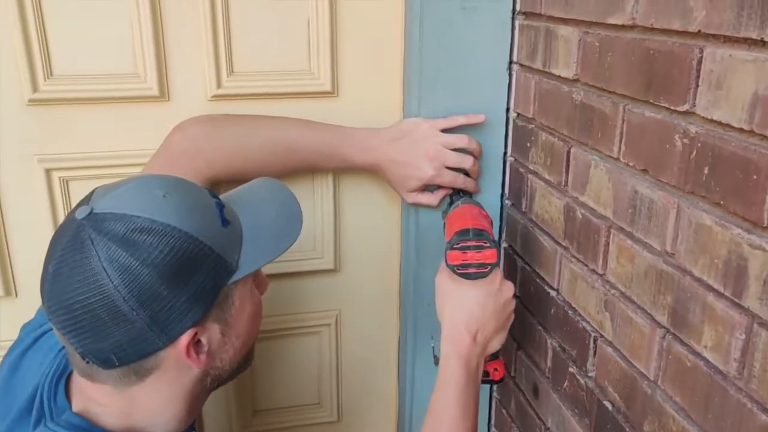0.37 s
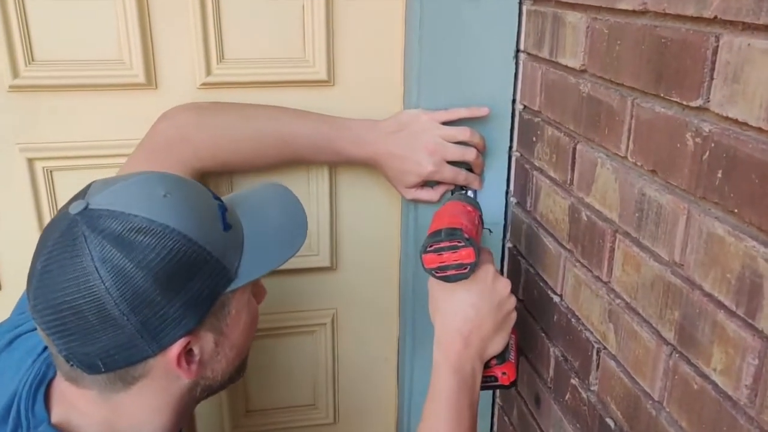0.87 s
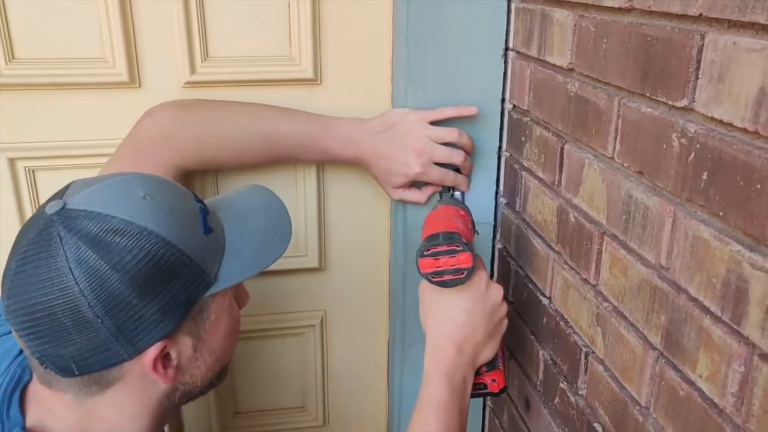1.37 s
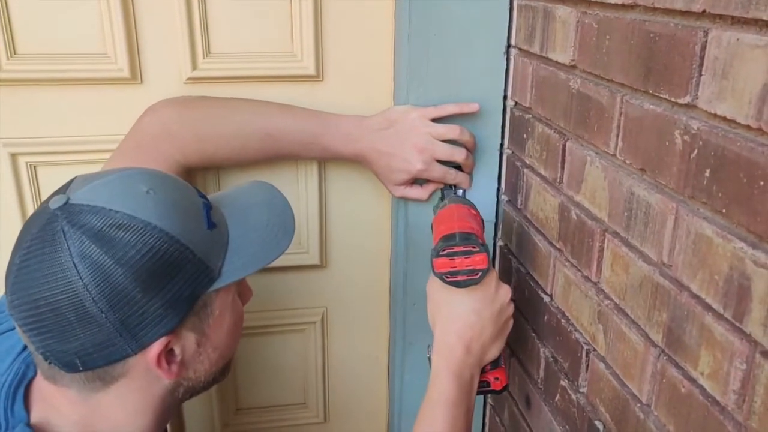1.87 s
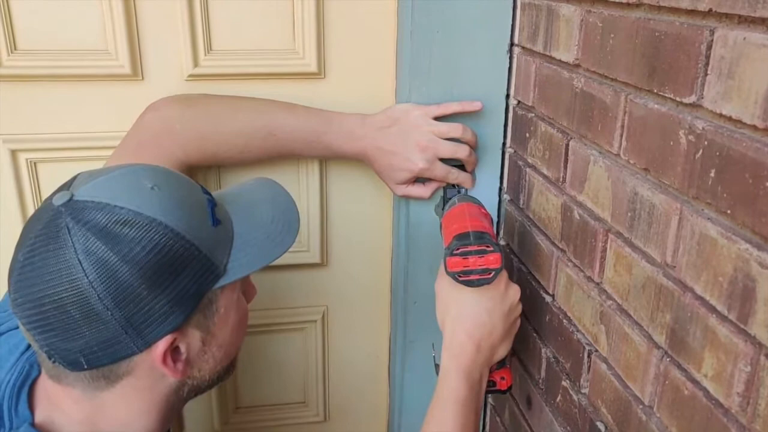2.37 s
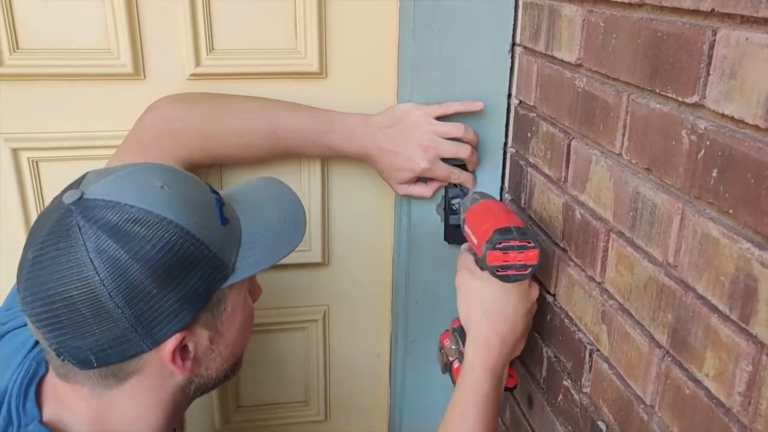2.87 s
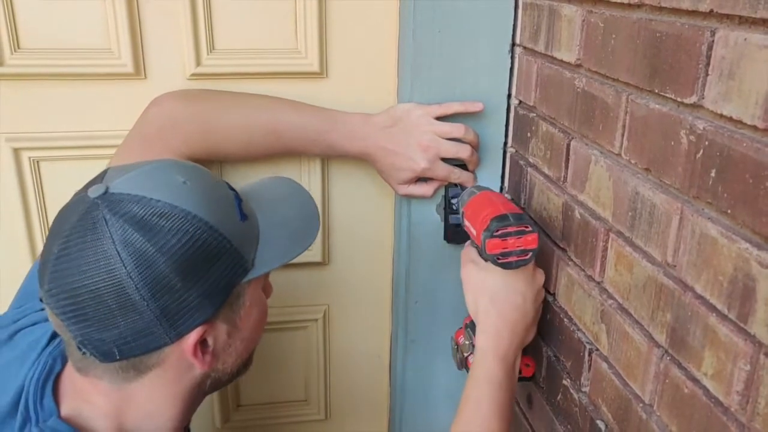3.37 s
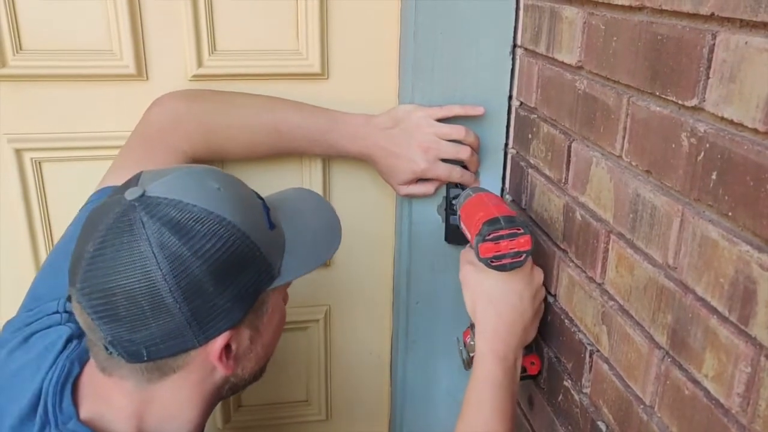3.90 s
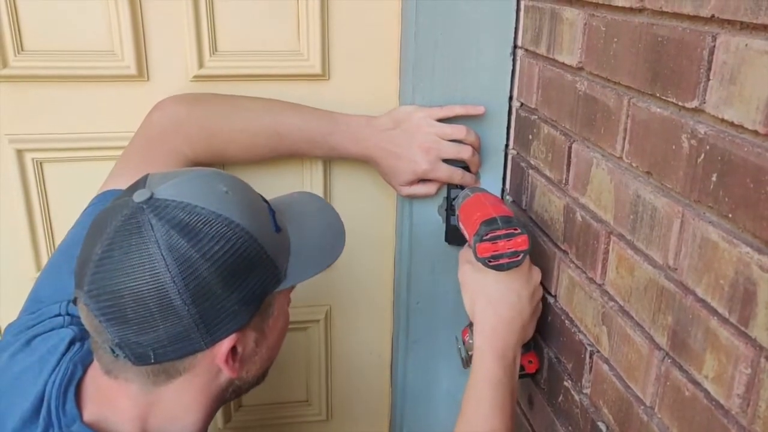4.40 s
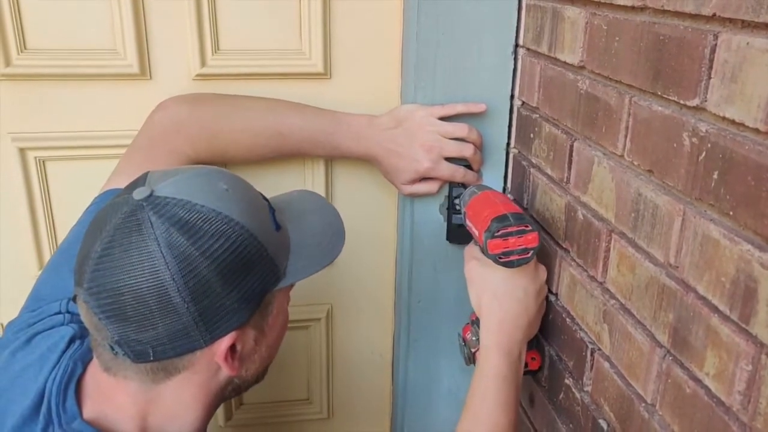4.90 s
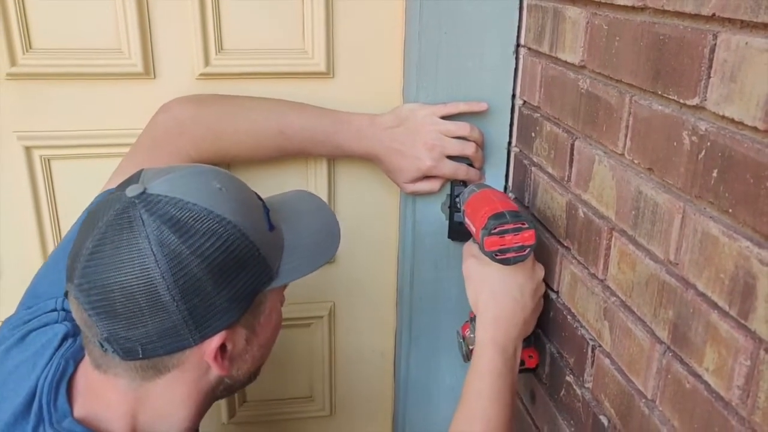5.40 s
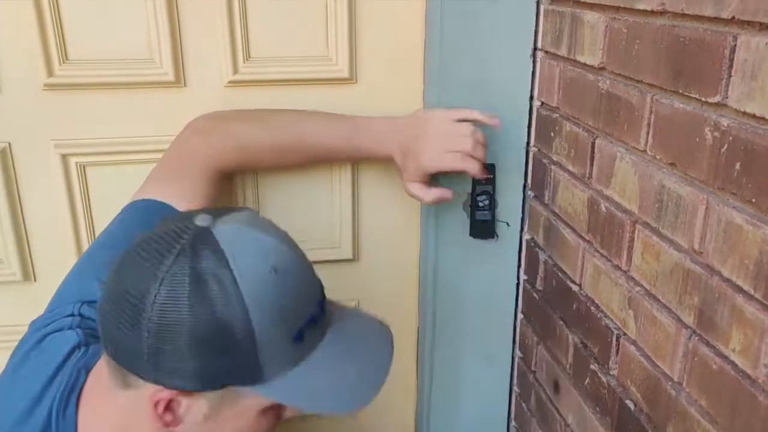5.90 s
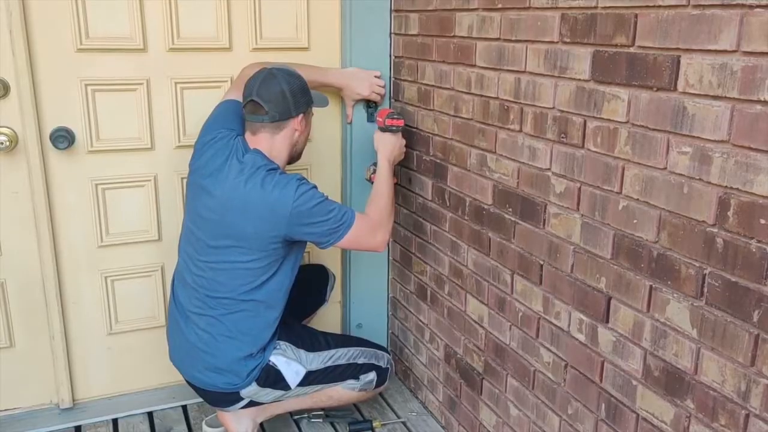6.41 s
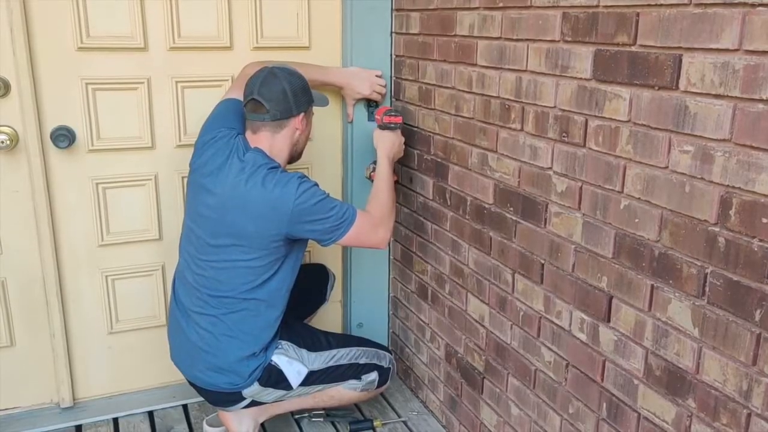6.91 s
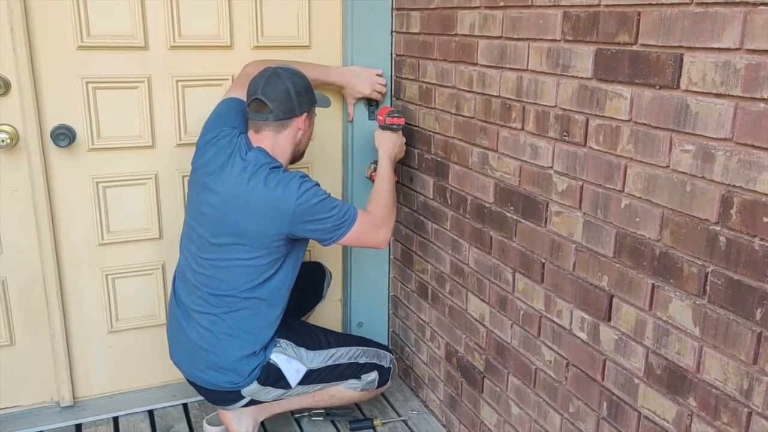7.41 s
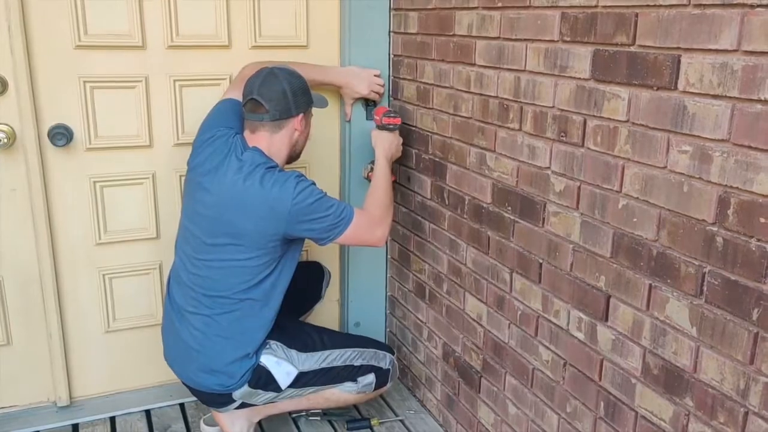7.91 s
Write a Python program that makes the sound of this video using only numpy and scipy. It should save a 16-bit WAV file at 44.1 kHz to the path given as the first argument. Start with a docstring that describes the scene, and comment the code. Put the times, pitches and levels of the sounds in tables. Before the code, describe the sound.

Brief cordless drill pulls rattle and whistle against a door jamb on a brick porch, ending in a rapid cluster of loud wooden knocks.

```python
"""Cordless drill on a porch

A cordless drill drives screws into door trim on a brick porch, in short trigger pulls.
Gear teeth rattle the housing and make the trim sing; the speed switch whistles as it chops the current.
Each slip of the bit knocks the jamb, thumps the door and cracks off the steel, between soft brushes.
Shaped noise and wavering hums make the yard; a noise-like tail makes the porch echo."""
import sys
import numpy as np
from scipy import signal
from scipy.fft import rfft, irfft
from scipy.io import wavfile
from scipy.ndimage import uniform_filter1d

SR = 44100
rng = np.random.default_rng(int(sys.argv[2]) if len(sys.argv) > 2 else 0)


def digitize_waveform(pressure):
    """Quantize a signal to 16-bit integers and store it at the path in sys.argv[1].

    Rows of a 2-D input are taken as channels; values are limited to [-1, 1].
    """
    field = np.atleast_2d(pressure).T
    bounded = np.clip(field, -1, 1)
    quanta = np.round(bounded * 32767).astype(np.int16)
    wavfile.write(sys.argv[1], SR, quanta)


def magnitude_from_level(level_db):
    """Linear magnitude for a level in decibels (20 dB per decade)."""
    exponent = np.asarray(level_db, float) / 20
    return 10 ** exponent


N = 353902  # length in samples

# colour of the outdoor air: f/Hz, relative level per Hz/dB
YARD_SPECTRUM = [(8.8, -24.5), (15, 3), (38, -8.5), (54, -18), (88, -4.5), (129, -17), (144, -17.5),
                 (177, -6), (205, -1), (399, -77.5), (600, -17.5), (1430, -15), (4080, -25.5), (4990, -25),
                 (15500, -30.5)]
# low rumble of the air: t/s, level/dB
RUMBLE_LEVEL = [(0, -50), (.9, -48), (1.1, -36), (1.499, -44), (2.501, -48.5), (3.501, -33), (4, -39.5),
                (4.7, -34.5), (5.099, -44.5), (5.699, -43), (6.5, -62), (7.1, -46), (7.349, -48.5),
                (7.701, -42), (8.02, -57)]
# distant machines: f/Hz, width/Hz, level/dB
DISTANT_HUMS = [(27.9, 1.1, -54.5), (80.7, 26, -55), (118.9, 0.9, -57)]
# how much left and right differ: f/Hz, side relative to mid/dB
SIDE_SPECTRUM = [(60, -24), (200, -25), (380, -11), (700, -13), (1290, -7), (2380, -1), (4400, 1),
                 (15000, 2)]
# a hand or tool brushes the trim: t/s, length/s, level/dB, centre f/Hz, width/Hz
BRUSH_STROKES = [(0.191, 0.055, -50.5, 4200, 4840), (2.991, 0.039, -53, 2454, 1792),
                 (5.62, 0.067, -46.5, 1500, 1164), (5.634, 0.02736, -61, 7000, 4000),
                 (5.908, 0.051, -61, 5500, 4001), (7.306, 0.035, -56, 5880, 3000)]
# the bit slips, seats or bottoms out:
# t/s, trim knock level/dB, door thump level/dB, depth of the thump/dB per octave, steel crack level/dB
BIT_BLOWS = [(0.309, -22, -39.5, -9, -30.5), (0.569, -35, -33, 24, -77), (1.19, -34, -42, 6, -32.5),
             (2.575, -16, -11.5, 5.5, -22), (2.763, -8.5, -9.5, 5.5, -19.5), (3.193, 1.5, -2.5, 2, -12),
             (4.246, -21, -18.5, 4, -20), (4.258, -6, 3, 1.9, -6), (4.358, 1.5, -16.5, -5.5, -10),
             (5.284, -11, -17.5, 1.5, -24.5), (5.293, -4, -2.5, -2.5, -21), (5.648, -26, -61, 2.5, -36.5),
             (6.848, -5, -3, -2, -11.5), (7.483, -5.5, -4, -3.5, -10.5), (7.811, -5.5, -2.5, -9, -8.5),
             (7.87, 2.5, -9, -0.5, -5.5), (7.882, -1.5, -3.5, 1.5, -26), (7.891, -2, -17, -14.5, -24.5),
             (7.942, -5.5, -9.5, 9.5, -4), (7.951, 3, -33, 7.5, -17), (7.961, -4.5, -6.5, -10.5, -12)]
# the gears take up slack with a small knock: t/s, level/dB
SLACK_KNOCKS = [(1.44, -37.5), (2.036, -51), (3.089, -33), (3.392, -22.5), (3.697, -23.5), (3.991, -20),
                (4.568, -40), (5.057, -40.5), (5.074, -31), (6.033, -43), (6.432, -36), (6.692, -32),
                (7.145, -38.5), (7.394, -30.5)]
# the drill lurches and shoves the door with no click: t/s, level/dB, depth/dB per octave
DOOR_SHOVES = [(3.165, -19, -16.5), (4.102, -11.5, 7.5), (4.291, -27, -10), (4.34, -2, -0.3),
               (6.827, -12.5, 1.5), (7.449, -19.5, 7.5), (7.792, -21, 0)]
# resonances of the door: f/Hz, relative level/dB, time to fade by 60 dB/s
DOOR_MODES = [(47.35, -14.5, 0.65), (73.65, -7.5, 0.32), (90.6, 0, 0.17), (116.7, 5, 0.13),
              (146.6, -10, 0.27), (176.1, 0, 0.16), (197, -11, 0.19), (224.1, -5.5, 0.17), (262, -16, 0.16),
              (414.7, -24.5, 0.13)]
# resonances of the jamb: f/Hz, relative level/dB, time to fade by 60 dB/s
JAMB_MODES = [(436, -15.5, 0.18), (568, -11, 0.056), (784, -8.5, 0.11), (820, -15.5, 0.2),
              (954.5, 17.5, .014), (1030, -6.5, 0.029), (1170, -23, 0.03863), (1322, -0.5, 0.029),
              (1573, 5.5, 0.012), (1997, 9.5, 0.0063)]
# colour of the steel crack: f/Hz, relative level per Hz/dB
CRACK_SPECTRUM = [(880, -20), (1500, 1), (2310, -7.5), (3150, -1.5), (4710, -5), (8050, -9), (9700, -29),
                  (10900, -20.5), (15500, -29)]
# resonances of the drill's housing: f/Hz, width/Hz, relative level/dB
HOUSING_MODES = [(2650, 570, 1.5), (3757, 183, -11), (4570, 640, 2.5), (4926, 250, 3), (7000, 160, -23.5)]
# one list each time the switch chops the current:
# t/s, level of the first partial before it radiates/dB, share of each cycle switched on/0-1
WHINE_RUNS = [
    [(0.807, -60.5, 0.34), (0.879, -66, 0.17), (1.133, -50.5, 0.25), (1.439, -47.5, 0.41),
     (1.755, -50, 0.44), (2.05, -52.5, 0.49), (2.349, -49.5, 0.48), (2.53, -47.5, .56), (2.585, -42, 0.57),
     (2.771, -41, 0.54), (2.8, -44, .6)],
    [(3.068, -51, 0.43), (3.17, -36.5, 0.4)],
    [(3.385, -42.5, 0.42), (3.48, -21.5, 0.48)],
    [(3.69, -39, 0.41), (3.82, -28.5, 0.49)],
    [(3.985, -43, 0.42), (4.09, -33.5, 0.5)],
    [(4.555, -43.5, .38), (4.72, -32, 0.46)],
    [(4.85, -55.5, 0.11), (4.922, -44.5, 0.38), (5.132, -38, 0.38), (5.224, -39.5, .4), (5.402, -44, 0.42),
     (5.48, -79, 0.45)],
    [(6.02, -53, 0.47), (6.32, -50.5, 0.46)],
    [(6.42, -64, .35), (6.52, -49, 0.45)],
    [(7.13, -53.5, 0.45), (7.25, -46, .48)],
    [(7.6, -57, 0.37), (7.66, -49, 0.53), (7.8, -44, .4)],
]
# direction of each whistle partial: left over right/dB, left lead/radians
WHINE_DIRECTIONS = [(4.5, -2.42), (-11.5, 1.8), (-0.5, 1.2), (0.2, 0.1)]
# how well each whistle partial radiates: level/dB
PARTIAL_RADIATION = [1, 2.5, -12, -13.5]
# the long feathered start, trigger barely squeezed: t/s, speed/teeth per second, gear level/dB
SLOW_START = [(.84, 46.4, -69), (0.959, 68.4, -57.5), (1.03, 67, -61), (1.11, 86, -50.5), (1.17, 88, -56.5),
              (1.24, 85, -65), (1.34, 80, -51.5), (1.47, 69, -62), (1.549, 60, -66.5), (2.12, 50.2, -69),
              (2.17, 62, -58), (2.42, 87, -57.5), (2.564, 146, -50)]
# trigger pulls: press t/s, release t/s, top speed/teeth per second, gear level/dB, spin-up/s, run-down/s
TRIGGER_PULLS = [(2.578, 2.757, 200, -41.5, .01, .006), (3.068, 3.183, 560, -31.5, .05, .006),
                 (3.385, 3.485, 605, -23, .07, .13), (3.691, 3.794, 530, -28.5, .05, .11),
                 (3.983, 4.06, 710, -23, .045, .1), (4.236, 4.335, 610, -22, .04, .03),
                 (4.553, 4.674, 510, -32.5, .08, 0.12), (5.037, 5.161, 465, -39, .06, .2),
                 (6.019, 6.321, 460, -40, .15, .08), (6.436, 6.543, 480, -34, .08, 0.12),
                 (6.685, 6.784, 420, -27, .015, 0.017), (6.792, 6.81, 575, -28, .005, 0.067),
                 (6.87, 6.997, 590, -30.5, .08, 0.058), (7.13, 7.231, 450, -45.5, .05, .08),
                 (7.385, 7.476, 570, -34, .03, 0.0093), (7.682, 7.817, 570, -38, .3, 0.0068)]
# colour of the gear rattle: f/Hz, relative level per Hz/dB
GEAR_SPECTRUM = [(760, -41.5), (1300, -2.5), (2120, -3), (2280, -5.5), (2630, -4.5), (3140, -2),
                 (3780, 3.5), (4200, -3.5), (5060, 0.5), (5610, -13.5), (6900, -8), (9920, -27.5),
                 (15500, -29.5)]
# colour of the noise from the trim: f/Hz, relative level per Hz/dB
TRIM_SPECTRUM = [(200, -1.5), (330, -17.5), (550, -12), (750, -2), (950, -5), (1150, -8.5), (1400, -15.5),
                 (2000, -16), (3500, -42.5)]
# how long the porch tail lasts: f/Hz, time to fade by 60 dB/s
PORCH_DECAY = [(100, 0.75), (700, 0.25), (3000, 0.25), (8000, 0.19), (15000, 0.18)]
# strength of the porch tail: f/Hz, level/dB
ECHO_STRENGTH = [(100, -17.5), (500, -5), (1500, -8.5), (4000, -3), (15000, -5.5)]
# tilt between the two sides: f/Hz, left over right/dB
LEFT_LEAN = [(60, 2), (110, 2), (200, 2), (380, 3), (700, 3.5), (1290, 1), (2380, 4), (4400, 3),
             (8120, -7.5), (15000, 3)]

YARD_DB = -62.5
SLACK_THUMP_DB, SLACK_DEPTH, SLACK_CRACK_DB = -8.5, -11.5, -8  # door and steel beside the knock; depth in dB/octave
WHINE_HZ = 3918
NULL_DEPTH = .05  # what is left where chopping cancels a partial
FIRST_SPEED, SPEED_LAW_DB = .3, 39  # share of top speed at the press; dB per tenfold of speed
UNLOAD_DB = 37.5  # the level sinks this far, ever faster, in one run-down time
TRIM_DB, TRIM_FOLLOWS = -10, 0.7  # the trim follows the gear level, less steeply
# the sung pitch comes out as the speed nears SUNG_AT (teeth per second)
SUNG_DB, SUNG_AT, SUNG_DB_PER_TOOTH, SUNG_FLUTTER_DB = -3.5, 462, .085, 5
SUNG_LOAD_DB, SUNG_PER_LOAD = -26, 0.46  # under this gear level the sung pitch sinks, dB per dB
SINGS_HZ, SINGS_WIDTH_HZ, SINGS_DB = 948, 365, 2.5  # where the trim sings loudest
TICKS_BELOW = 188  # teeth per second under which the trim gives single ticks
TICK_DB, TICK_SPREAD_DB = 8.5, 5  # slow teeth knock the jamb, some much harder than others


def evened(x):
    """Scales to rms 1."""
    return x / np.sqrt(np.mean(x ** 2) + 1e-20)


def read(points, hz):
    """Reads a table of values along a logarithmic frequency axis."""
    f, value = np.transpose(points)
    return np.interp(np.log(hz + 1), np.log(f + 1), value)


def add(mix, s, sound):
    """Mixes a sound in at time s, cut off at the end of the mix."""
    part = mix[..., round(s * SR):][..., :sound.shape[-1]]
    part += sound[..., :part.shape[-1]]


def colour(x, points):
    """Filters with the gain of a spectrum, never sounding ahead of its input."""
    log_gain = np.log(magnitude_from_level(read(points, abs(np.fft.fftfreq(4096, 1 / SR)))))
    # the Hilbert transform gives the phase that packs the energy as early as possible
    taps = np.fft.ifft(np.exp(signal.hilbert(log_gain).conj())).real[:2048]
    return signal.oaconvolve(x, taps)[:len(x)]


def resonate(x, hz, width):
    """A resonance of gain 1, steady or moving: shift down to 0 Hz, smooth, shift back up."""
    turn = np.exp(2j * np.pi * np.cumsum(hz * np.ones(len(x))) / SR)
    r = np.exp(-np.pi * width / SR)
    return 2 * (turn * signal.lfilter([1 - r], [1, -r], x / turn)).real


def yard():
    """Outdoor hush, lumpy low rumble and faint wavering hums, all made from filtered noise."""
    hz = np.fft.rfftfreq(2 * N, 1 / SR)
    noise = rng.standard_normal((4, 2 * N))
    air = magnitude_from_level(read(YARD_SPECTRUM, hz))
    apart = magnitude_from_level(read(SIDE_SPECTRUM, hz)) * rfft(noise[1])  # added on the left, subtracted on the right
    hush = evened(irfft((rfft(noise[0]) + [apart, -apart]) * air)[:, :N])
    low = evened(irfft(rfft(noise[2]) * air / (1 + (hz / 110) ** 6))[:N])
    s, db = np.transpose(RUMBLE_LEVEL)
    rumble = magnitude_from_level(np.interp(np.arange(N) / SR, s, db)) * low
    hums = sum(magnitude_from_level(d) * evened(resonate(noise[3, :N], f, width)) for f, width, d in DISTANT_HUMS)
    return magnitude_from_level(YARD_DB) * hush, rumble + hums


def brushes():
    """Short soft scrapes: bursts of noise around one pitch, faded in and out."""
    out = np.zeros(N)
    for s, length, db, hz, width in BRUSH_STROKES:
        noise = resonate(rng.standard_normal(SR // 4), hz, width)[:round(length * SR)]
        add(out, s, magnitude_from_level(db) * evened(noise) * signal.windows.tukey(len(noise), .6))
    return out


def ring(modes, t, chance, rise, depth=0):
    """Fading sine modes of wood with peak 1; chance shifts their levels and pitches a little."""
    hz, db, t60 = np.transpose(modes)[..., None]
    # more depth favours the bass
    db = db - depth * np.log2(np.maximum(hz, 76) / 120) + 2 * chance[:len(modes), None]
    hz = hz * (1 + .015 * chance[::-1][:len(modes), None])
    fading = magnitude_from_level(db - 60 * t / t60) * np.sin(2 * np.pi * hz * t)
    sound = -fading.sum(0) * (1 - np.exp(-t / rise))
    return sound / abs(sound).max()


def blows():
    """Each blow knocks the jamb, thumps the door and a moment later cracks off the steel bit."""
    wood, steel, t = np.zeros(N), np.zeros(N), np.arange(SR // 2) / SR
    slack = [(s, db, db + SLACK_THUMP_DB, SLACK_DEPTH, db + SLACK_CRACK_DB) for s, db in SLACK_KNOCKS]
    hits = BIT_BLOWS + slack
    chances, noise = rng.standard_normal((len(hits), 2, 16)), rng.standard_normal(N + SR)
    # a fast fade with a weak slower tail
    crack = (magnitude_from_level(-60 * t / 0.03) + 0.19 * magnitude_from_level(-60 * t / 0.2)) * (1 - np.exp(-t / 0.0025))
    for (s, knock_db, thump_db, depth, crack_db), chance in zip(hits, chances):
        add(wood, s - .0008, magnitude_from_level(knock_db) * ring(JAMB_MODES, t, chance[0], rise=0.00081))
        add(wood, s, magnitude_from_level(thump_db) * ring(DOOR_MODES, t, chance[1], rise=0.0062, depth=depth))
        add(steel, s, magnitude_from_level(crack_db) * crack)
    for (s, db, depth), chance in zip(DOOR_SHOVES, rng.standard_normal((len(DOOR_SHOVES), 16))):
        add(wood, s, -magnitude_from_level(db) * ring(DOOR_MODES, t, chance, rise=0.011, depth=depth))
    # the tool rings too
    body = sum(magnitude_from_level(db) * evened(resonate(noise, hz, width)) for hz, width, db in HOUSING_MODES)
    crackle = evened(evened(colour(noise, CRACK_SPECTRUM)) + magnitude_from_level(-11.5) * body)[:N]
    return wood + steel * crackle


def whine():
    """Clean partials of the chopping switch: the on-share sets their balance; each has its own direction."""
    now, level, duty = np.arange(N) / SR, np.zeros(N), np.full(N, .5)
    for rows in WHINE_RUNS:
        s, db, share = np.transpose(rows)
        edge = np.clip(np.minimum(now - s[0], s[-1] - now) / 0.0028, 0, 1)
        level += edge * magnitude_from_level(np.interp(now, s, db))
        duty = np.where(edge > 0, np.clip(np.interp(now, s, share), .02, .98), duty)
    drift = evened(uniform_filter1d(rng.standard_normal(N), size=8000))
    turns = WHINE_HZ * now + 0.097 * drift
    out, side = np.zeros((2, N)), np.array([[.5], [-.5]])
    for k, (db, lead) in enumerate(WHINE_DIRECTIONS, 1):
        # strength of partial k in a pulse train, beside the first
        pulse = np.sin(k * np.pi * duty) / (k * np.sin(np.pi * duty))
        strength = np.sqrt(2) * level * np.hypot(pulse, NULL_DEPTH)
        gain = magnitude_from_level(PARTIAL_RADIATION[k - 1] + side * db)
        out += strength * gain * np.sin(2 * np.pi * k * turns + side * lead)
    return out


def motor():
    """Speed and gear level: each pull spins up to its top speed, then runs down unloaded."""
    now = np.arange(N) / SR
    s, creep_rate, creep_db = np.transpose(SLOW_START)
    rate = np.interp(now, s, creep_rate, right=creep_rate[0])
    level = magnitude_from_level(np.interp(now, s, creep_db)) * (now > s[0]) * (now < s[-1])
    for press, release, top, db, spin_up, run_down in TRIGGER_PULLS:
        t = np.clip(now - press, 0, release - press)
        progress = np.expm1(-t / spin_up) / np.expm1((press - release) / spin_up)
        rising = FIRST_SPEED + (1 - FIRST_SPEED) * progress
        coast = np.maximum(now - release, 0) / run_down
        speed = rising * np.exp(-coast)
        fade = np.clip((now - press) / 0.0054, 0, 1)
        rate = np.where(now > press, np.maximum(top * speed, creep_rate[0]), rate)
        level = level + fade * magnitude_from_level(db + SPEED_LAW_DB * np.log10(rising) - UNLOAD_DB * coast ** 2.16)
    return rate, level


def housing_rattle(rate, teeth, hiss):
    """Tooth blows and hiss ring the housing's resonances, brighter when the gears run faster."""
    grit = evened(uniform_filter1d(rng.standard_normal(N), size=300))
    rattle = (1.43 * hiss + 0.51 * teeth) * magnitude_from_level(2.0 * grit)
    # each resonance comes and goes
    swells = uniform_filter1d(rng.standard_normal((len(HOUSING_MODES), N)), size=1200)
    rings = sum(magnitude_from_level(db + 3.5 * evened(swell)) * evened(resonate(rattle, hz, width))
                for (hz, width, db), swell in zip(HOUSING_MODES, swells))
    # a high order glides with speed
    squeal = evened(resonate(rattle, 8 * rate, 250)) * np.clip(rate / 500, 0, 1) ** 2
    housing = evened(evened(colour(rattle, GEAR_SPECTRUM)) + magnitude_from_level(-11.5) * rings + magnitude_from_level(-30.5) * squeal)
    dull = signal.sosfilt(signal.butter(2, 8000, fs=SR, output="sos"), housing)
    return dull + (housing - dull) * np.clip(rate / 550, 0, 1.2)


def trim_song(rate, level, turns, teeth, hiss):
    """The trim sings the tooth rate and its multiples, hisses, and ticks under slow teeth."""
    sung_db = SUNG_DB + SUNG_DB_PER_TOOTH * np.minimum(rate - SUNG_AT, 0)
    sung_db += SUNG_PER_LOAD * np.minimum(20 * np.log10(level + 1e-9) - SUNG_LOAD_DB, 0)
    flutter = evened(uniform_filter1d(rng.standard_normal(N), size=500))
    fundamental = np.clip(rate / 650, 0, 1) ** 3  # the trim hardly radiates the lowest pitches
    growl = fundamental * np.sin(2 * np.pi * turns) + np.sin(4 * np.pi * turns)
    growl += 0.5 * np.sin(6 * np.pi * turns) + 0.43 * np.sin(8 * np.pi * turns)
    growl = .5 * growl + magnitude_from_level(SINGS_DB) * resonate(growl, SINGS_HZ, SINGS_WIDTH_HZ)
    growl *= magnitude_from_level(sung_db + SUNG_FLUTTER_DB * flutter)
    blur = np.clip(rate / TICKS_BELOW, 0, 1)
    noise = evened(colour(1.73 * blur * hiss + 0.332 * teeth, TRIM_SPECTRUM))
    slow = (teeth > 0) * (1 - blur) * magnitude_from_level(TICK_DB + TICK_SPREAD_DB * rng.standard_normal(N))
    knock = ring(JAMB_MODES, np.arange(SR // 20) / SR, np.zeros(16), rise=0.00024)
    return 0.47 * noise + growl + signal.oaconvolve(slow, knock)[:N]


def gears():
    """Uneven tooth blows, and the hiss each one gates, drive the housing and the trim."""
    rate, level = motor()
    wander = evened(uniform_filter1d(rng.standard_normal(N), size=600))
    turns = np.cumsum(rate * (1 + .012 * wander)) / SR  # counted in teeth
    strikes = np.diff(np.floor(turns), prepend=0) > 0
    teeth = strikes * magnitude_from_level(4.1 * rng.standard_normal(N)) * np.sqrt(SR / rate)
    since = turns % 1 / rate  # seconds since the last tooth: slow gears tick, fast ones blur
    hiss = (0.473 + np.exp(-since / 0.0022)) * rng.standard_normal((2, N))
    trim_level = magnitude_from_level(TRIM_DB) * level ** TRIM_FOLLOWS
    housing = level * housing_rattle(rate, teeth, hiss[0])
    return housing + trim_level * trim_song(rate, level, turns, teeth, hiss[1])


def porch(x):
    """Direct sound and a brick-walled tail; left and right agree in the bass and differ in the treble."""
    taps = np.zeros((2, SR // 2))
    # one echo of random sign at a random spot in every 20 samples
    at = np.arange(40, SR // 2 - 20, 20) + rng.integers(0, 20, (2, (SR // 2 - 41) // 20))
    np.put_along_axis(taps, at, rng.choice([-1., 1.], at.shape), 1)
    hz, t, z = signal.stft(taps, SR, nperseg=256)
    z *= magnitude_from_level(-60 * t / read(PORCH_DECAY, hz)[:, None])
    energy = np.linalg.norm(signal.istft(z[0], SR, nperseg=256)[1])
    z[0] *= magnitude_from_level(read(ECHO_STRENGTH, hz))[:, None]
    tails = signal.istft(z, SR, nperseg=256)[1] / energy
    tails[0, 0] += 1  # direct sound
    tails[1, 9] += .15  # a little of it, slightly late, sets the sides apart
    mid, side = signal.oaconvolve(x[None], tails, axes=1)[:, :N]
    side = colour(side, SIDE_SPECTRUM)
    lean = magnitude_from_level(np.outer([.5, -.5], read(LEFT_LEAN, np.fft.rfftfreq(N, 1 / SR))))
    return irfft(rfft([mid + side, mid - side]) * lean, N)


def scene():
    """All but the hush sounds through the porch; the whistle is also heard direct, its porch copy faint."""
    hush, rumble = yard()
    whistle = whine()
    near_door = brushes() + blows() + gears() + rumble
    return porch(near_door + magnitude_from_level(-10.0) * whistle.sum(0)) + whistle + hush


def band_limit(x):
    """A steep low-pass at the top of the band."""
    return signal.sosfilt(signal.butter(12, 15650, fs=SR, output="sos"), x)


def record(dry):
    """The loudest thumps overload the input, which flattens their peaks."""
    mix = np.clip(dry, -.98, .98)
    return band_limit(mix)


dry = scene()
out = record(dry)
digitize_waveform(out)
```